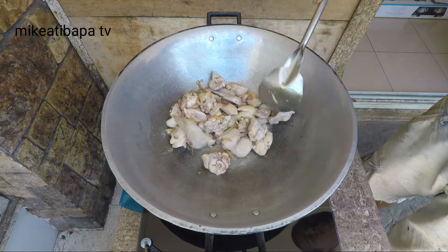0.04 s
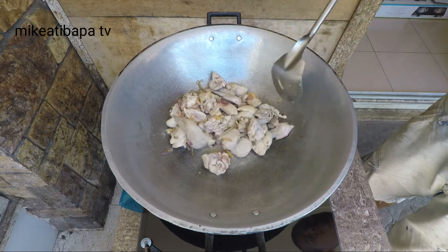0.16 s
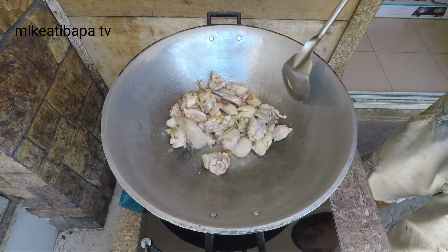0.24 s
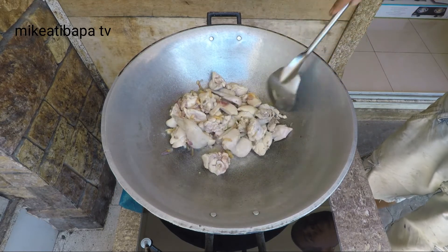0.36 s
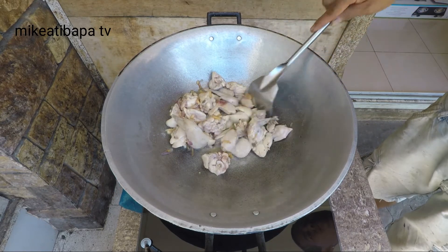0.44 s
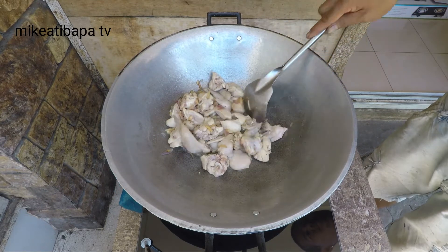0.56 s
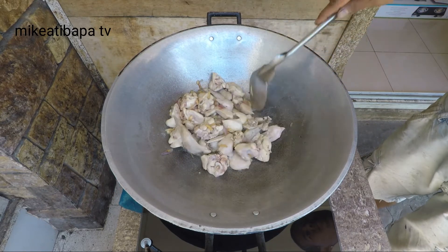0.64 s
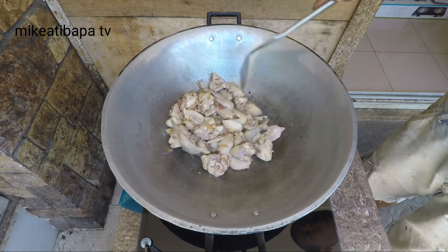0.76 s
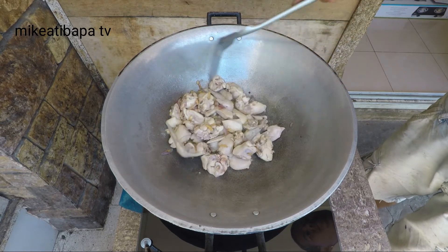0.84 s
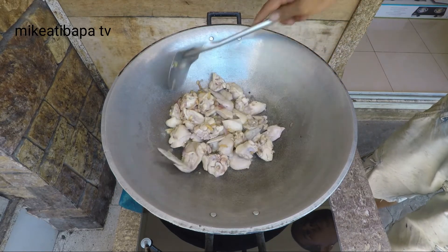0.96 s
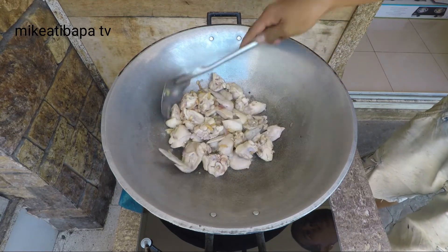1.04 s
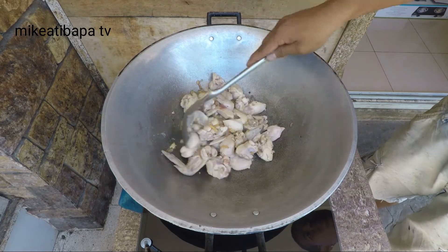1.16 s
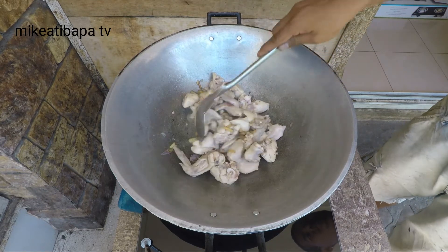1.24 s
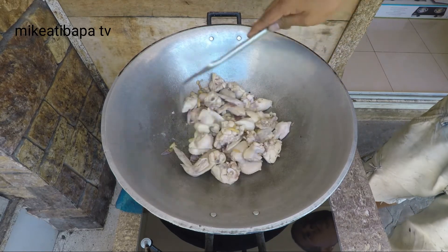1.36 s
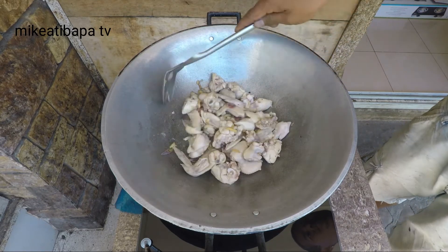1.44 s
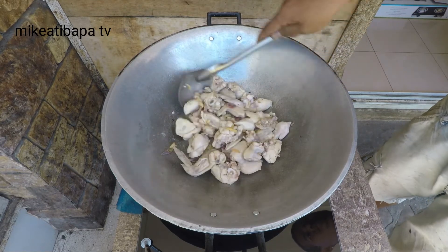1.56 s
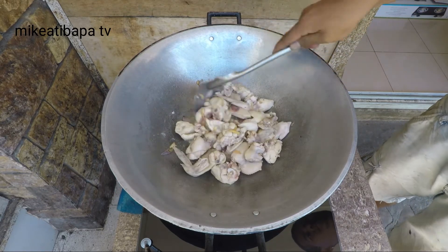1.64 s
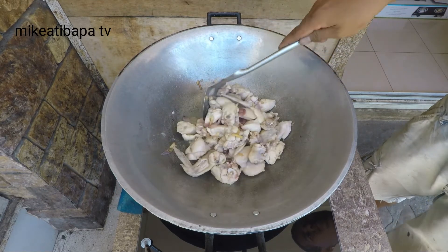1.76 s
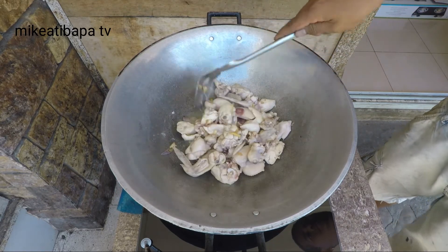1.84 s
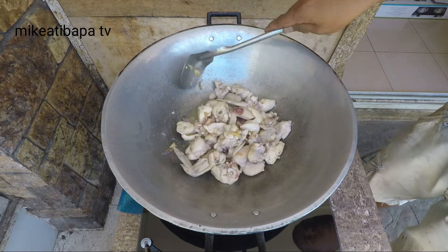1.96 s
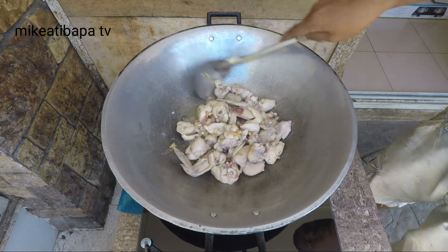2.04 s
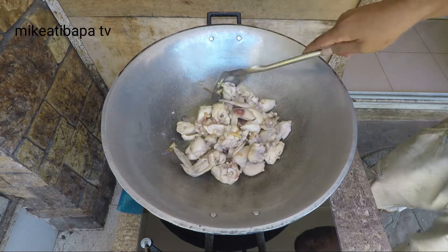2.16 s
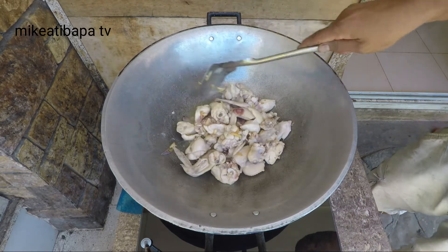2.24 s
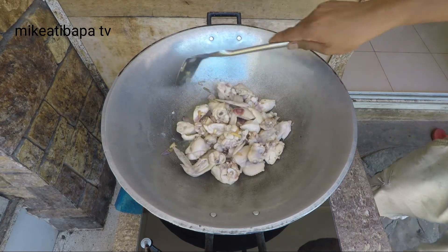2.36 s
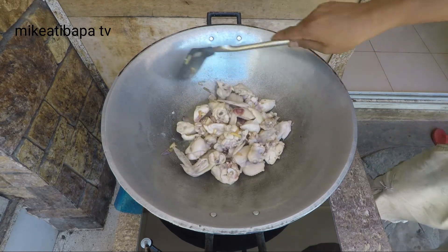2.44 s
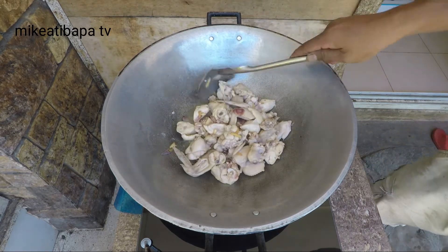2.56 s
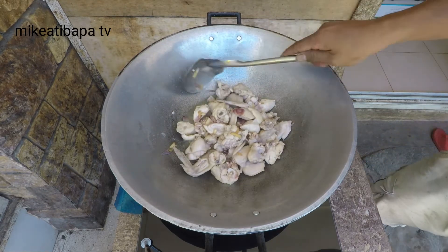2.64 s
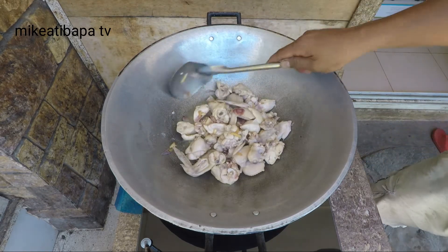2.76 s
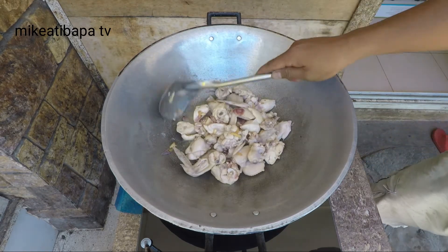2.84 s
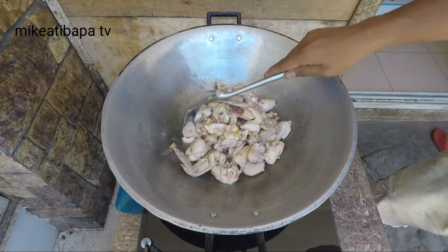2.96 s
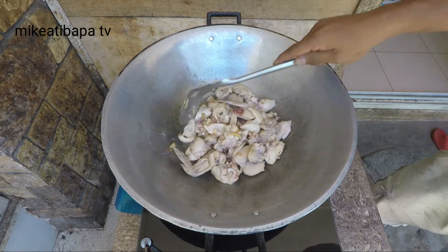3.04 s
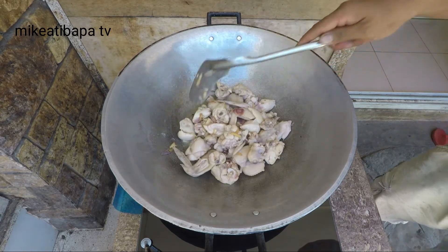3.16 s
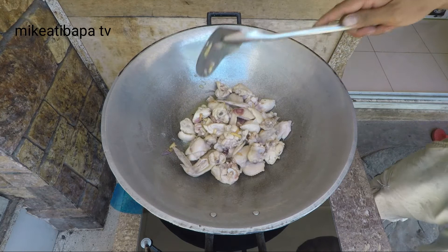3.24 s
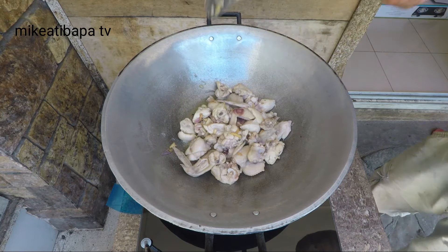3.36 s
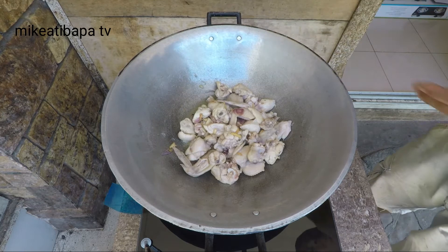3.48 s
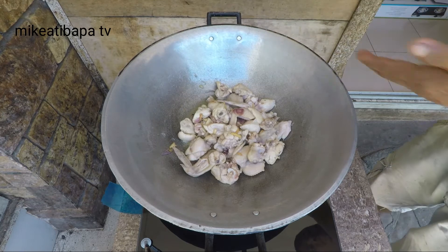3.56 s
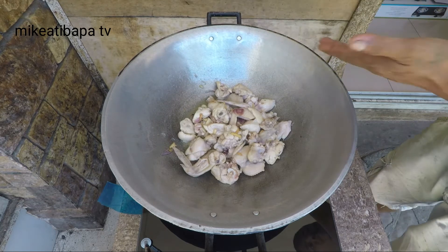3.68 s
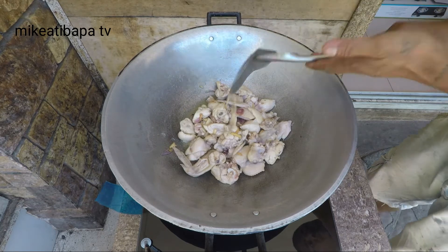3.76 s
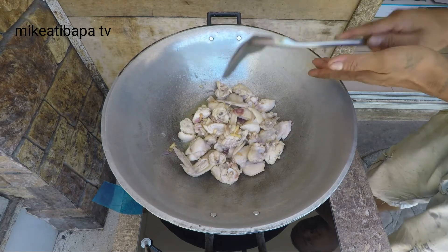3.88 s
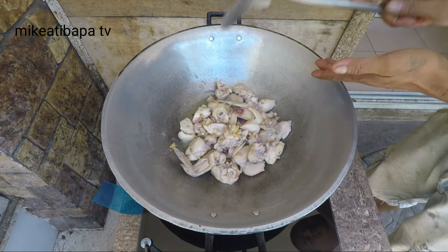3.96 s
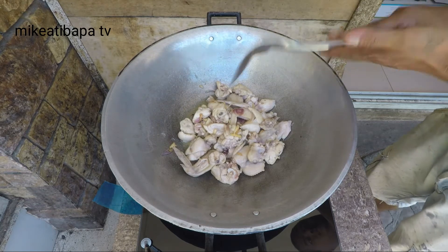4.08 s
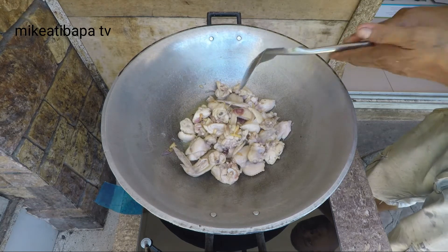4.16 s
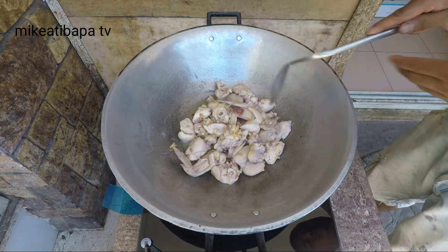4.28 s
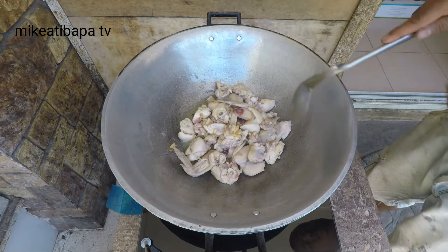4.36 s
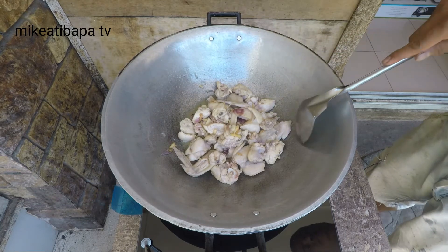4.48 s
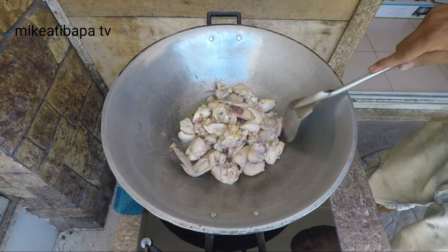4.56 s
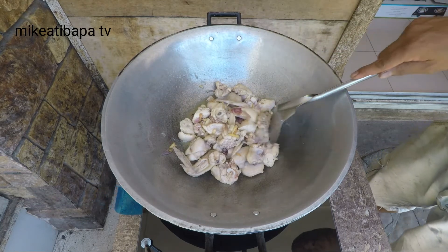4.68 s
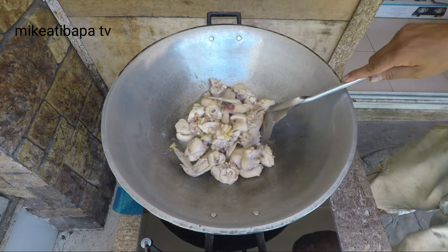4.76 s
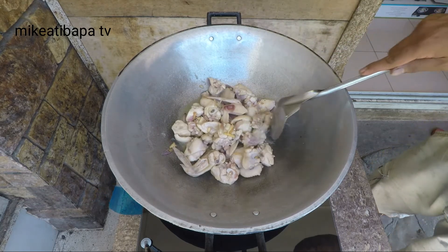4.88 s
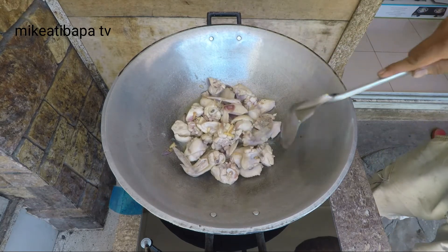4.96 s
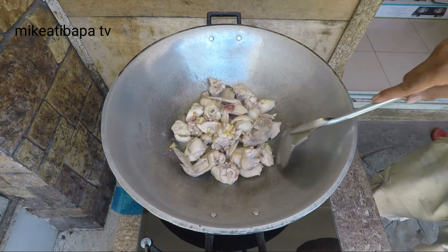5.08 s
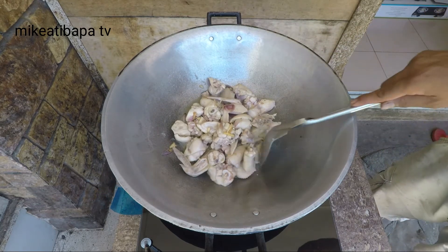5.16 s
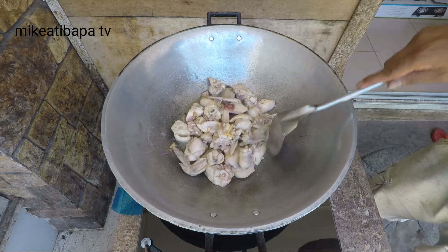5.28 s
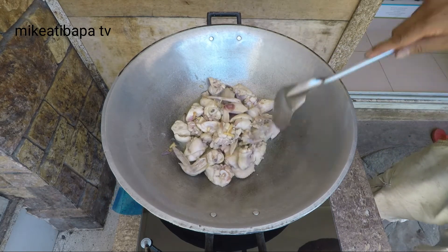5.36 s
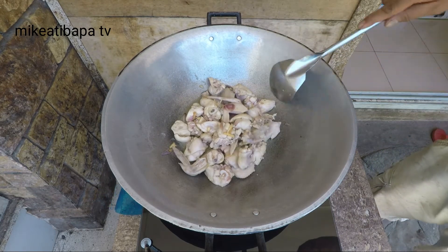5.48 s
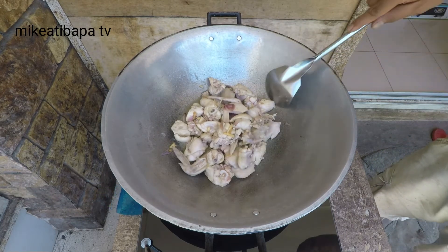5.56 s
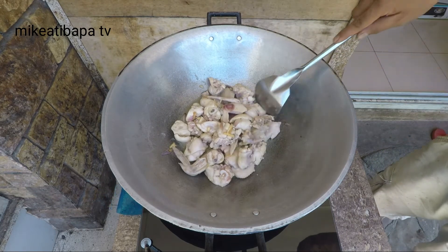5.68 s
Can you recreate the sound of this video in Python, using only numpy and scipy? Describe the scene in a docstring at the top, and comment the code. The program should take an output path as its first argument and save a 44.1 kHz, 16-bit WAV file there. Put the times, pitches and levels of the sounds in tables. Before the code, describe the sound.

A metal ladle turns chicken pieces in a large wok over a gas flame, captured close in stereo. Soft, crackly frying hiss and a low fluttering burner rumble with a faint hollow drone continue throughout. At 0.2 s a sharp clank rattles on two quick rebounds, followed by scraping and short metallic squeals until about 0.5 s. More clanks, each with a brief scrape or chirp, land near 0.9, 1.4, 1.9, 2.3 and 2.7 s, while the wok bounces on its stand with deep, pitch-bending booms and thuds. From about 3 to 4.4 s the stirring stops; only sizzle and rumble remain, with barely audible ticks at 3.7 and 4.0 s. The loudest clank comes at 4.4 s, with a soft scrape and hoarse rasp. A soft low push at 4.9 s leads to a double knock and lower squeak around 5.05 s, then a strong ringing clank and scrape at 5.5 s closes.

```python
"""Ladle and wok over a gas flame

A metal ladle turns pieces of chicken in a large wok: each stroke clanks, chatters on two rebounds and
scrapes or squeals, from filtered noise, slip grains, swept tones and short partials damped by the food.
Pushes make the wok bounce and boom on its stand as gliding low tones with noisy thuds.
Steam-bubble grains sizzle in the oil over a fluttering noise rumble and the drone of the flame."""
import sys
import numpy as np
from scipy import signal
from scipy.fft import rfft, irfft, next_fast_len
from scipy.io import wavfile
from scipy.ndimage import uniform_filter1d

SR = 44100
rng = np.random.default_rng(int(sys.argv[2]) if len(sys.argv) > 2 else 0)


def transcribe(signal):
    """Save signal, clipped to [-1, 1], as a 16-bit WAV file at the path in sys.argv[1]."""
    frames = np.atleast_2d(signal).T
    limited = np.clip(frames, -1, 1)
    pcm = np.round(limited * 32767).astype(np.int16)
    wavfile.write(sys.argv[1], SR, pcm)


N = 251811
TIME = np.arange(N) / SR  # s
TAIL = TIME[:SR // 2]  # half a second for each impact response

# frequency ranges that answer to different parts of the blade, low and high f/Hz
HOLLOW, BOWL, BLADE, CLANK, EDGE = (250, 600), (600, 1500), (1500, 2800), (2800, 4300), (4300, 15000)
RANGES = (HOLLOW, BOWL, BLADE, CLANK, EDGE)
SETTLE_RATIO, SETTLE_DB = 0.77, -3  # second rebound against the first: spacing ratio, level in dB

# Ladle blows on the wok, before the trims; bowl, blade, edge and rebound are relative to the level:
# t/s, level/dB, bowl level/dB, blade level/dB, edge level/dB, rebound delay t/s, rebound level/dB,
# thump level/dB
LADLE_BLOWS = [(0.2158, -8.5, -14.5, -12.5, -4.5, .011, -5, -30),
               (.3, -23.5, -4, -0.5, -7, 0.016, -3.5, -26.5),
               (.922, -13.5, -23, -13, -2.5, .0173, -3.5, -33.5),
               (1.4131, -11.5, -27, -8, -5, .012, -4, -27), (1.4846, -14.5, -34, -17, -10, .012, -18, -50),
               (1.8745, -13, -30, -7.5, -9.5, .0195, -5.5, -26.5),
               (2.1548, -34, -19, -5, -5, .01, -16, -68), (2.3428, -12, -18, -13, -3.5, .012, -2, -24),
               (2.6547, -11, -31, -14, -6, .0095, -1, -29), (3.6617, -28, 2.5, -6, -3, .01, -17, -55),
               (4.019, -35, 7, -16, 2.5, .01, -27, -45), (4.428, -3, -23, -15.5, -5, .0067, -11, -33),
               (5.0271, -8.5, -11.5, -13, -4, .008, -20, -30),
               (5.076, -15.5, -4.5, -17, -7, .007, -5, -26.5),
               (5.4846, -5.5, -15.5, -10.5, -5, .009, -10, -29)]


def knocks(gain_db=-7.0, hollow_db=-20, bowl_lift_db=2, blade_lift_db=2, edge_lift_db=3.5,
           crack_db=-6, crack_t60=0.0045):
    """The ladle cracks down and rebounds twice on one spot; the blade angle decides which ranges ring."""
    out = np.zeros((2, N))
    attack = SR // 200  # 5 ms window for the peak level
    for s, db, bowl_db, blade_db, edge_db, gap, rebound_db, _ in LADLE_BLOWS:
        crack = colour(rng.standard_normal(len(TAIL)) * fade(crack_t60), CLASH_COLOUR)
        answer = wok(modes_db=-10, clash_t60=.04, room_db=-13, room_t60=.28, wide_db=-5)
        tap = undb(crack_db) * crack + answer
        shares_db = (hollow_db, bowl_db + bowl_lift_db, blade_db + blade_lift_db, 0, edge_db + edge_lift_db)
        clank = 0
        for edges, rel_db in zip(RANGES, shares_db):
            part = band(tap, edges)
            peak = np.sqrt(uniform_filter1d(part.mean(axis=0) ** 2, attack).max())
            clank = clank + part / peak * undb(db + rel_db + gain_db)
        second_delay = gap * (1 + SETTLE_RATIO)
        landings = ((0, 0), (gap, rebound_db), (second_delay, rebound_db + SETTLE_DB))
        for delay, drop_db in landings:
            add(out, undb(drop_db) * clank, s + delay)
    return ports(out)


# Partials of wok and ladle together, before random scatter: f/Hz, decay t60/s, level/dB
WOK_PARTIALS = [(432, 0.78, 12.5), (439, 0.16, 5), (710, 0.14, -30), (1062, 0.031, 1), (1327, 0.13, -6.5),
                (1620, 0.087, -24), (1701, 0.031, 2), (1836, 0.12, -1.5), (1915, 0.23, -6),
                (2390, 0.079, 5.5), (3336, 0.26, 4), (3290, 0.13, -3.5), (3520, 0.16, 0.5), (3628, 0.12, 4),
                (3775, 0.059, -4.5), (4490, 0.12, -6.5), (4600, 0.1, -19), (4710, 0.061, -3.5),
                (5200, 0.021, -34), (5540, 0.21, -10), (5970, 0.099, -10.5), (6300, 0.11, -8),
                (6880, 0.3, -10), (7530, 0.13, -9.5), (8890, 0.25, -11.5)]
# Colour of the dense, quickly damped modes between those partials: f/Hz, level/dB
CLASH_COLOUR = [(300, 13.5), (450, 17.5), (600, -21), (900, 0.5), (1300, -0.5), (1800, 0), (2100, 4.5),
                (2750, -4), (3350, 19), (4200, -2), (4700, -0.5), (7500, -6), (10000, -14.5),
                (14000, -67.5)]


def wok(modes_db, clash_t60, room_db, room_t60, wide_db=-8):
    """A tapped wok: clear partials, a short dense clash all over the bowl and a faint kitchen tail."""
    centre = rng.standard_normal(len(TAIL))
    sides = undb(wide_db) * rng.standard_normal((2, len(TAIL)))
    dense = (centre + sides) * fade(clash_t60)
    room = undb(room_db) * rng.standard_normal((2, len(TAIL))) * fade(room_t60)
    partials = modal(WOK_PARTIALS, scatter_db=3, detune=.004)
    return colour(dense + room, CLASH_COLOUR) + undb(modes_db) * partials


JOLT_HZ, JOLT_T60_S, JOLT_DB = 144, 0.12, -9  # jolt on the stand, against the level of the blow
# Low modes of the bowl, before random scatter: f/Hz, decay t60/s, level/dB
BOWL_MODES = [(148, 0.25, -0.5), (204.7, 0.45, -10.5), (367, 0.18, -5), (398.4, 0.26, 3.5), (397, 0.44, -7),
              (460.7, 0.38, 3.5)]


def thumps(build_s=0.0073):
    """Each landing jolts the wok and thumps the bowl; low modes build up while the ladle presses in."""
    out = np.zeros(N)
    build = 1 - np.exp(-TAIL / build_s)
    jolt = undb(JOLT_DB - 60 * TAIL / JOLT_T60_S) * np.sin(2 * np.pi * JOLT_HZ * TAIL) * build
    for s, db, *_, thump_db in LADLE_BLOWS:
        boom = modal(BOWL_MODES, scatter_db=1.5) * build
        boom = boom / boom[:SR // 20].std()  # level set over the first 50 ms
        add(out, undb(thump_db) * boom + undb(db) * jolt, s)
    return ports(out)


JUDDER_DB = 2.2  # spread of the slip level
# Colour of the tiny slips, which are sharper than a blow: f/Hz, level/dB
SLIP_COLOUR = [(7500, 0.5), (10000, 1), (13000, 3.5)]
# Blade drawn over the metal, before the trims; bowl, blade and edge are relative to the level:
# start t/s, rise t/s, fall t/s, level/dB, bowl level/dB, blade level/dB, edge level/dB
BLADE_SCRAPES = [(.23, 0.078, 0.11, -27.5, -10, -4.5, 0.5), (0.336, 0.037, 0.036, -28.5, 4, -0.5, -1.5),
                 (.385, 0.022, 0.095, -27.5, -6.5, -7, -6), (.97, 0.066, 0.089, -35, -28, -11, -2),
                 (1.1, 0.13, 0.12, -39, -8, -1.5, -2), (1.415, 0.061, 0.11, -27, -17, -8, -3),
                 (1.54, 0.048, 0.12, -42, -6, -2, -3.5), (1.93, 0.037, 0.073, -21.5, -26, -8.5, -4),
                 (2.389, 0.045, 0.056, -23.5, -18, -4, 2.5), (2.719, 0.094, 0.068, -38, -15, -1, 5),
                 (4.44, 0.077, 0.12, -34, -8, -1, 1.5), (4.52, 0.11, 0.12, -32, -1, -0.5, -4),
                 (5.04, 0.043, 0.059, -25, -4, 0, -1), (5.549, 0.067, .1, -29.5, 0.5, -3.5, -5.5)]


def scrapes(gain_db=-0.98, hollow_db=-16, shift_db=1):
    """The blade catches on rough metal about 2000 times a second, in uneven bursts that ring the wok."""
    slips = colour(grains(rate=2000, spread_db=2.5), SLIP_COLOUR) * undb(JUDDER_DB * walk(140))
    out = np.zeros((2, N))
    shifts = [walk(70) for _ in RANGES]  # the wobbling blade favours now one range, now another
    for s, rise, fall, db, bowl_db, blade_db, edge_db in BLADE_SCRAPES:
        # every stroke meets the wok at another place and so rings it differently
        place = ports(wok(modes_db=-18, clash_t60=.02, room_db=-12, room_t60=.16))
        span = slice(int(s * SR), int((s + rise + 2 * fall) * SR))
        rub = signal.fftconvolve(slips[None, span], place, axes=1)[:, :len(slips[span])]
        pressure = swell(s, rise, fall)[span]
        shares_db = (hollow_db, bowl_db, blade_db, 0, edge_db)
        for edges, shift, rel_db in zip(RANGES, shifts, shares_db):
            level = undb(db + rel_db + gain_db + shift_db * shift[span])
            out[:, span] += pressure * level * unit(band(rub, edges))
    return out


# Stick-slip on one resonance, which slides as the contact moves, before the flutter:
# start t/s, rise t/s, fall t/s, f/Hz at the end of the rise, glide/octaves per s,
# unsteadiness as a share of f, level/dB
BLADE_SQUEALS = [(.218, .008, .05, 2332, 0, .003, -21), (.265, .025, .03, 2332, 0, .005, -27),
                 (.25, .04, .05, 4540, 0, .003, -31), (.3, .018, .025, 3300, 0, .01, -24),
                 (.335, .035, .055, 1300, -9, .09, -27), (.921, .004, .045, 1790, 0, .022, -22),
                 (.921, .003, .042, 3320, 0, .011, -18), (.921, .004, .05, 5600, 0, .006, -29),
                 (1.432, .03, .08, 1785, .2, .014, -24), (1.435, .045, .04, 3320, 0, .007, -21),
                 (1.955, .024, .03, 1850, 1, .03, -28), (2.415, .02, .022, 1800, 3, .012, -20),
                 (2.77, .025, .025, 6120, 0, .005, -37), (2.795, .025, .025, 3270, 0, .008, -31),
                 (4.55, .055, .06, 1130, 1.5, .09, -25), (5.066, .014, .025, 1860, 0, .04, -22),
                 (5.086, .022, .075, 1090, -.3, .014, -16)]


def squeals(flutter_db=3):
    """The blade sticks and slips in short swelling tones; the unsteadiest are only a hoarse rasp."""
    out, stumble = 0, walk(700)
    for s, rise, fall, hz, glide, unsteady, db in BLADE_SQUEALS:
        octaves = glide * np.clip(TIME - s - rise, -rise, 2 * fall)
        pitch = hz * 2 ** octaves * (1 + unsteady * stumble)
        out = out + undb(db) * swell(s, rise, fall) * np.sin(2 * np.pi * np.cumsum(pitch) / SR)
    return ports(np.sqrt(2) * out * undb(flutter_db * walk(220)))


BOUNCE_HZ, SWAY_HZ = 80, 40  # central pitches of the wok left to itself
PUSH_ATTACK_S, PRESS_S = 0.02, .045  # build-up of the motion; push start to greatest pressure
# Pushes by the cook, before the trims: t/s, hold t/s, dying away/dB per s, bounce level/dB,
# sway level/dB, greatest rise of the bounce pitch f/Hz
COOK_PUSHES = [(-.03, 0.17, 68, -22, -19, 16), (0.197, 0.18, 32, -20.5, -17, 9),
               (0.844, 0.043, 56, -17.5, -16, 0), (0.917, 0.29, 43, -14, -23, 24.5),
               (1.412, 0.077, 32.5, -12.5, -17.5, 15), (1.88, 0.11, 23, -12.5, -23, 11.5),
               (2.34, 0.11, 28, -13.5, -22, 10.5), (2.673, 0.061, 55, -14.5, -19, 22.5),
               (4.43, 0.084, 52, -17.5, -14, 13.5), (4.88, 0.095, 75, -21.5, -23, 16.5),
               (5.018, 0.14, 73, -22, -16.5, 9), (5.478, 0.21, 58, -19, -17.5, 13)]


def rocking(bounce_db=0, sway_db=-1.5, thud_db=-9, lurch_db=3.5, wobble_db=1.9):
    """A push bounces the wok, higher while the ladle presses; the stand sways in lurches and thuds."""
    bounce, sway, bounce_hz = 0, 0, BOUNCE_HZ
    for s, hold, db_per_s, push_db, lean_db, rise_hz in COOK_PUSHES:
        age = np.maximum(TIME - s, 0)
        motion = np.minimum(age / PUSH_ATTACK_S, 1) * undb(-db_per_s * np.maximum(age - hold, 0))
        bounce = np.hypot(bounce, undb(push_db) * motion)
        sway = np.hypot(sway, undb(lean_db) * motion)
        pressure = (age / PRESS_S * np.exp(1 - age / PRESS_S)) ** 2
        bounce_hz = bounce_hz + rise_hz * pressure
    bounce_hz = bounce_hz * (1 + 0.01 * walk(50))
    sway_hz = SWAY_HZ * (1 + 0.1515 * walk(22))
    bounce_level = undb(bounce_db + wobble_db * walk(30)) * bounce
    sway_level = undb(sway_db + lurch_db * walk(25)) * sway
    tones = bounce_level * np.sin(2 * np.pi * np.cumsum(bounce_hz) / SR)
    tones = tones + sway_level * np.sin(2 * np.pi * np.cumsum(sway_hz) / SR)
    # f/Hz, level/dB
    thud_colour = [(15, -17.5), (28, -4.5), (60, -6.0), (115, 7), (150, -13), (200, -21), (330, -25.0),
                   (600, -53.0), (1500, -74)]
    thud = unit(ports(colour(rng.standard_normal(N), thud_colour)))
    return ports(np.sqrt(2) * tones) + undb(thud_db) * (sway + 0.19 * bounce) * thud


SIZZLE_FLICKER_DB = .6  # spread of the frying level
# Course of the frying, before gain and flares: t/s, level/dB
SIZZLE_COURSE = [(0.0, -45), (1.04, -45), (2.1, -49), (4.99, -45), (5.4, -46.5)]
# Colour of the frying oil: f/Hz, level/dB
OIL_COLOUR = [(350, -13.5), (600, 1), (633, -6), (695, 0), (764, -3.5), (817, -6.5), (1440, -10),
              (1600, -2.5), (1900, 0.5), (2730, -2), (3580, 0.5), (4370, -7.5), (6540, -8), (13100, -47.5),
              (14800, -50)]


def sizzle(gain_db=1, near_db=-3, flare_db=-14, flare_s=0.19):
    """Steam bubbles burst in the oil, some heard directly and most off the walls of the wok.
    Scrapes through the bottom of the bowl turn the food onto hot metal, and the frying flares up."""
    near, left, right = (grains(rate=7000, spread_db=3.0) for _ in range(3))
    spray = undb(near_db) * near + np.array([left, right])
    tilt = [(500, -2), (1200, 6.5), (2000, -3), (6000, -1.5), (9000, 11.0)]  # f/Hz, level/dB
    hiss = ports(colour(colour(spray, OIL_COLOUR), tilt))
    hiss = hiss / band(hiss.mean(axis=0), (2500, 10000)).std()
    flare = 0
    for s, rise, _, db, bowl_db, _, _ in BLADE_SCRAPES:
        flare = flare + undb(db + bowl_db + flare_db) * swell(s, rise, flare_s)
    level = np.hypot(undb(curve(SIZZLE_COURSE) + gain_db), flare)
    return hiss * level * undb(SIZZLE_FLICKER_DB * walk(11))


FLAME_DB = -28.5  # roar level before the flutter
# Colour of the gas flame: f/Hz, level/dB
FLAME_COLOUR = [(12, -29), (20, 9), (38, -5), (60, -3), (92, -1), (151, -13.5), (169, -27), (240, -30),
                (268, -21.5), (447, -20.5), (624, -27.5), (900, -30), (1170, -58), (1980, -120)]
# Resonances that the flame wakes under the wok, before scatter: f/Hz, decay t60/s, level/dB
HOLLOW_MODES = [(214, 0.28, -7), (243.1, 0.33, -4), (404, 0.15, -2), (454.3, 0.12, 4.5)]


def flame(flutter_db=2.0, hollow_db=-47):
    """The gas flame flutters as coloured noise and drones by exciting the hollow under the wok."""
    roar = colour(rng.standard_normal(N) + 0.11 * rng.standard_normal((2, N)), FLAME_COLOUR)
    drone = ring(rng.standard_normal(N), modal(HOLLOW_MODES, scatter_db=2.5)[None])
    roar_level = undb(FLAME_DB + flutter_db * walk(18))
    return unit(ports(roar)) * roar_level + undb(hollow_db) * unit(ports(drone))


# The two microphone ports: f/Hz, left minus right level/dB, left phase lead/rad
MIC_PORTS = [(35, -1, -.2), (60, -1, -.6), (85, -3, -1.1), (150, -2, -.9), (250, 6, 1.4), (430, 9, 3),
             (700, 3, 2.4), (1100, 0, 2.45), (1500, -2, .7), (1900, 4, .8), (2100, 9, 0), (2300, 5, -1.4),
             (2800, -1, -1.5), (3100, -3, -.5), (4000, 0, -.1), (5000, 6, 0), (6700, 6, -.6), (7800, 0, .7),
             (9200, -7, 2), (12000, -2, 0)]


def ports(x):
    """Each microphone port colours and delays the sound in its own way: opposite halves of the table."""
    size = next_fast_len(x.shape[-1] + SR // 10) * 2
    hz, db, lead = np.transpose(MIC_PORTS)
    bins = np.fft.rfftfreq(size, 1 / SR)
    half = undb(np.interp(bins, hz, db) / 2) * np.exp(.5j * np.interp(bins, hz, lead))
    return irfft(rfft(x, size) * np.array([half, 1 / half]), size)[..., :x.shape[-1]]


def modal(modes, scatter_db, detune=0):
    """Decaying partials, weighted and detuned anew for each point of contact."""
    shifts = 1 + detune * rng.standard_normal(len(modes))
    total = 0
    for (hz, t60, db), shift in zip(modes, shifts):
        level = undb(db + scatter_db * rng.standard_normal())
        total = total + level * fade(t60) * np.sin(2 * np.pi * (hz * shift * TAIL + rng.random()))
    return total


def grains(rate, spread_db):
    """Random tiny impacts of either sign, rate per second, a few much larger than the rest."""
    size = undb(spread_db * np.minimum(rng.exponential(size=N), 5))
    return (rng.random(N) < rate / SR) * size * rng.choice([-1, 1], N)


def swell(s, rise, fall):
    """Pressure of the blade: it grows evenly, then lets go."""
    age = TIME - s - rise
    return np.clip(1 + age / rise, 0, 1) * np.exp(-2 * (np.maximum(age, 0) / fall) ** (3 / 2))


def fade(t60):
    """Exponential decay with unit energy."""
    env = 1000. ** (-TAIL / t60)
    return env / np.linalg.norm(env)


def walk(rate):
    """Smooth random motion with a spread of 1, about rate new values a second."""
    size = max(int(SR / rate), 1)
    steps = np.repeat(rng.standard_normal(N // size + 1), size)
    smooth = uniform_filter1d(steps, size)[:N]
    return smooth / smooth.std()


def curve(table):
    """A table of (t/s, value) joined by straight lines."""
    return np.interp(TIME, *np.transpose(table))


def colour(x, points):
    """Causal minimum-phase filter with the given (f/Hz, level/dB) outline."""
    size = next_fast_len(x.shape[-1] + SR // 10) * 2
    hz, db = np.transpose(points)
    bins = np.maximum(np.fft.rfftfreq(size, 1 / SR), 1)
    cepstrum = irfft(np.log(undb(np.interp(np.log(bins), np.log(hz), db))))
    # fold the cepstrum onto positive time
    cepstrum[1:size // 2] *= 2
    cepstrum[size // 2 + 1:] = 0
    return irfft(rfft(x, size) * np.exp(rfft(cepstrum)), size)[..., :x.shape[-1]]


def band(x, edges):
    """Causal band-pass."""
    return signal.sosfilt(signal.butter(4, edges, "band", fs=SR, output="sos"), x)


def ring(force, response):
    """Sound of a resonant response driven by a force."""
    return signal.fftconvolve(force[None], response, axes=1)[:, :N]


def undb(db):
    """Decibels to gain."""
    return 10 ** (np.asarray(db) / 20)


def unit(x):
    """Scale a stereo sound so that its centre has rms 1."""
    return x / np.sqrt(np.mean(x.mean(axis=0) ** 2))


def add(out, sound, s):
    """Mix a sound in from the given time."""
    start = int(s * SR)
    out[..., start:start + sound.shape[-1]] += sound[..., :N - start]


def scene():
    """Ladle, wok, oil and flame together."""
    ladle = knocks() + thumps() + scrapes() + squeals()
    return ladle + rocking() + sizzle() + flame()


TOP_HZ = 15000  # highest pitch kept


def record(dry):
    """Peaks are held at full scale, then a steep low-pass cuts the top."""
    low_pass = signal.ellip(8, .2, 70, TOP_HZ, fs=SR, output="sos")
    return signal.sosfilt(low_pass, np.clip(dry, -1, 1))


dry = scene()
out = record(dry)
transcribe(out)
```